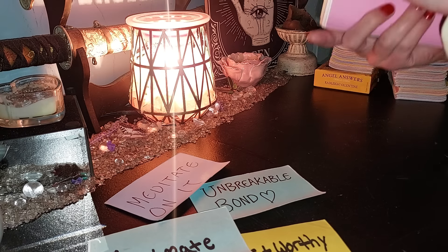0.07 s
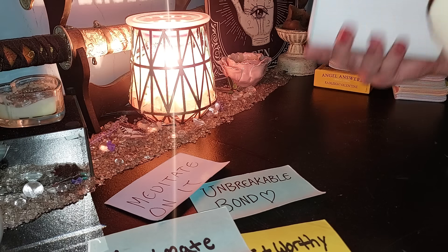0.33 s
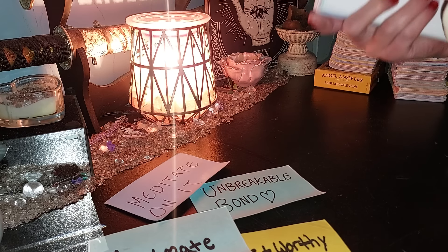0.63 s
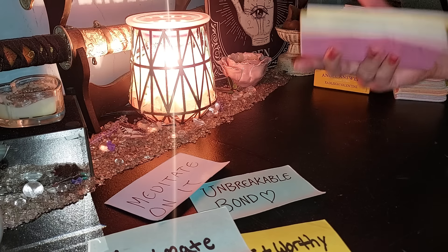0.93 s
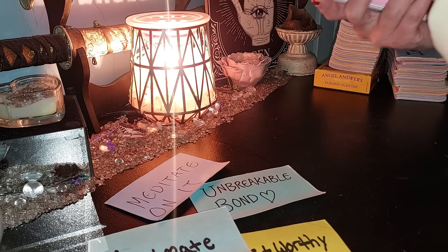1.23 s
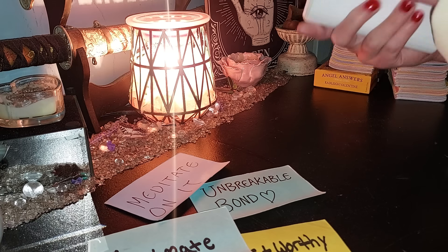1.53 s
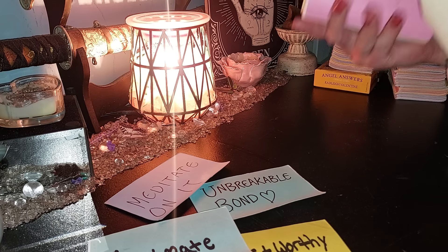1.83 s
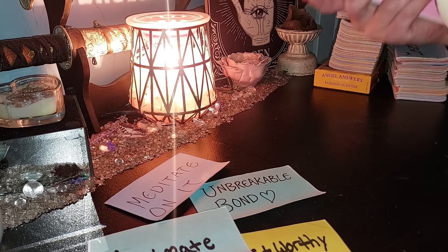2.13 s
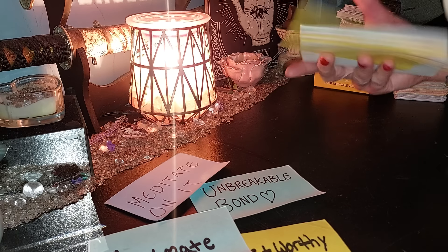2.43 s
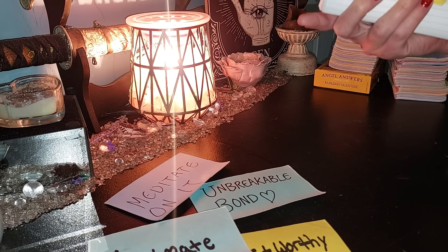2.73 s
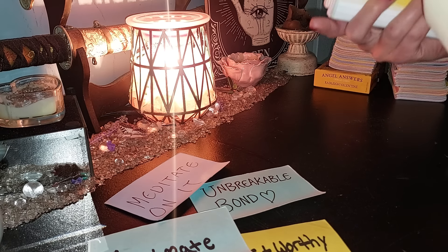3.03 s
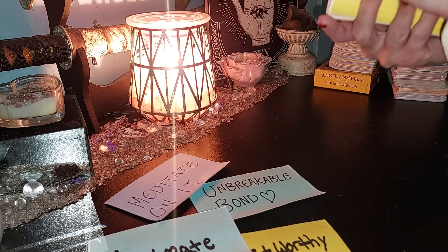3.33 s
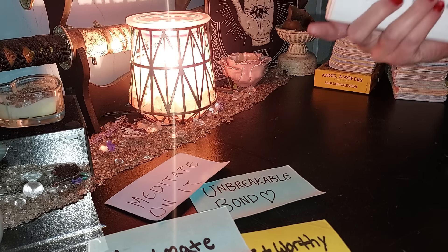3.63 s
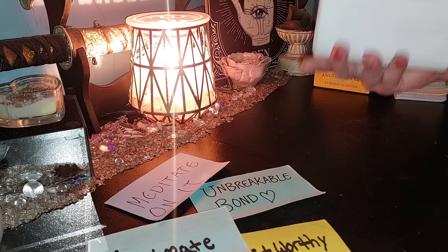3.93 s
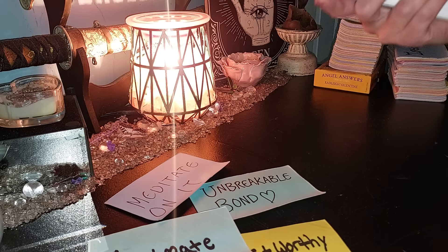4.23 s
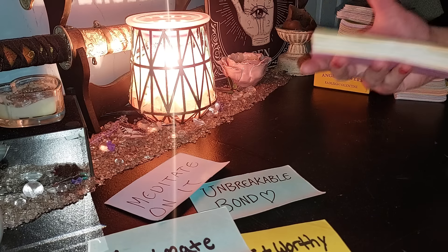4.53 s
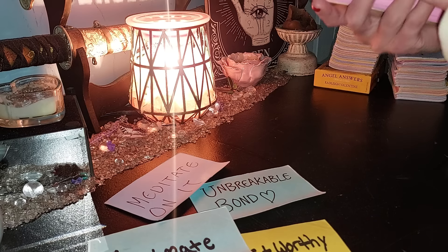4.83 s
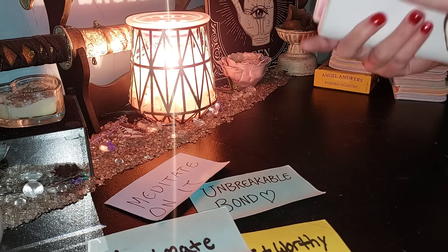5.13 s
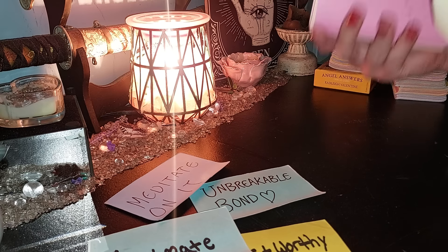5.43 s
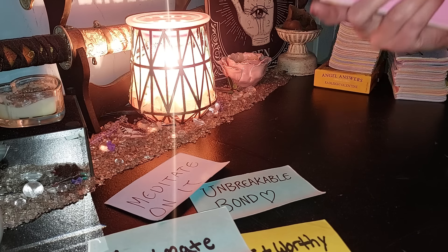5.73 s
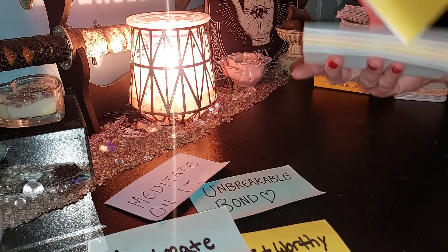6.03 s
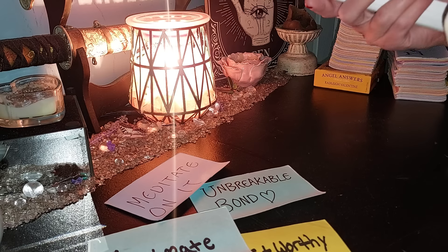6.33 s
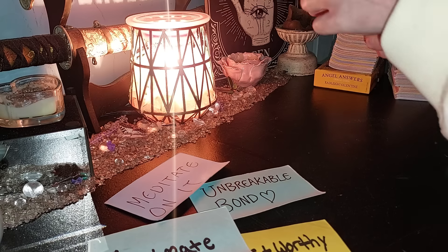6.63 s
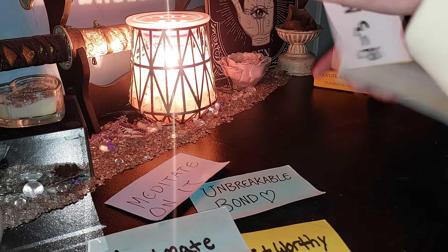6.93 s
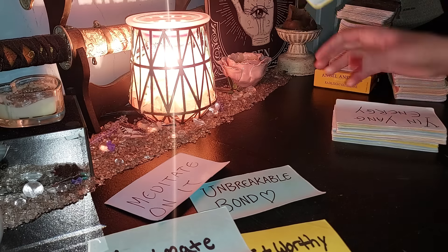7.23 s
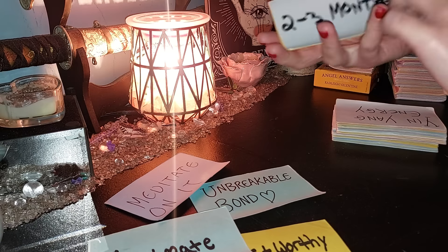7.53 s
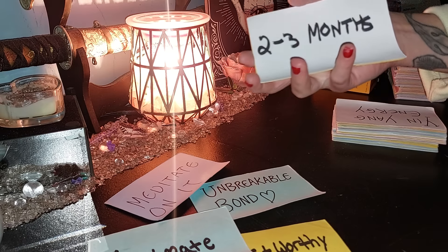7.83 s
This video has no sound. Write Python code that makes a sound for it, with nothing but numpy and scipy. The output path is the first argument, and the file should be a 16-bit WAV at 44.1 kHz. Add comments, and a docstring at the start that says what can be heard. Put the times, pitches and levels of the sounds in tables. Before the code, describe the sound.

A thick deck of cards is shuffled overhand, close to the microphone. Right at the start a packet slaps flat onto the rest and is squared up. Then, about twice a second, another packet is pulled with a papery swish, flicks free of the fingers, scrapes briefly and lands with a crisp slap. Stray cards catch and knock lightly in between. Around 3 seconds the slaps pause, leaving a few hissing slides. They resume at about 3.6 seconds, somewhat louder, and stop just after 6 seconds. Near 7 seconds a card slides out with a soft rub and small knocks, and at 7.2 seconds the deck is set on the desk with a dull thud. Faint sliding follows, then a few softer bumps at 8 seconds. The small room adds a short echo and a quiet, steady low rumble throughout.

```python
"""A thick deck of cards is shuffled overhand above a desk, over the quiet rumble of a small, live room.
A first packet lands edge first, slaps flat and is squared up. Then, about twice a second, another is
pulled, swishes, flicks free of the fingers and scrapes along the deck to its own landing; stray cards
catch and knock. The strokes pause near 3 s, resume, and stop just after 6 s. A card is drawn out, the
deck is set down on the desk with a dull thud at 7.2 s, and a few softer bumps follow at 8 s."""
import sys
import numpy as np
from scipy import signal
from scipy.fft import rfft, irfft, next_fast_len
from scipy.io import wavfile
from scipy.ndimage import uniform_filter1d

SR = 44100
rng = np.random.default_rng(int(sys.argv[2]) if len(sys.argv) > 2 else 0)


def unload_wav(signal):
    """Save mono or channel-first audio to the path in sys.argv[1] as 16-bit WAV at rate SR, clipped to [-1, 1]."""
    wavfile.write(
        sys.argv[1],
        SR,
        np.round(np.clip(np.atleast_2d(signal).T, -1, 1) * 32767).astype(np.int16),
    )


N = 355754
HIT_SIZE, PRE_ROLL = 4096, 256  # samples: one hit's FFT, and the lead-in to its impact
HIT_HZ = np.fft.rfftfreq(HIT_SIZE, 1 / SR)


def amp(db):
    """Decibels to gain."""
    return 10 ** (np.asarray(db) / 20)


def unit(x):
    """Scales to rms 1."""
    return x / np.sqrt(np.mean(x ** 2) + 1e-20)


def curve(points, hz):
    """Reads breakpoints on a log-frequency axis."""
    f, value = np.transpose(points)
    return np.interp(np.log(hz + 1), np.log(f + 1), value)


def add(mix, s, sound):
    """Drops a stereo sound into the mix at time s."""
    part = mix[:, max(round(s * SR), 0):][:, :sound.shape[1]]
    part += sound[:, :part.shape[1]]


def stereo(z, correlation):
    """Blends two unrelated signals into left and right, as mid and side."""
    angle = np.arccos(np.clip(correlation, -1, 1)) / 2
    return np.array([np.cos(angle) * z[0] + side * np.sin(angle) * z[1] for side in (1, -1)])


def whiten(z, bins):
    """Flattens a spectrum's broad shape, keeping its fine ripple."""
    return z / np.sqrt(abs(uniform_filter1d(abs(z) ** 2, bins, axis=-1)) + 1e-12)


def minimum_phase(db):
    """Spectrum of the tightest response that has this EQ."""
    log_gain = np.log(amp(np.maximum(db, -100)))
    mirrored = np.r_[log_gain, log_gain[-2:0:-1]]
    return np.exp(np.conj(signal.hilbert(mirrored)))[:len(db)]


def coloured(noise, eq, correlation):
    """Gives noise an EQ and a stereo width, at rms 1."""
    size = next_fast_len(N)
    hz = np.fft.rfftfreq(size, 1 / SR)
    spectrum = stereo(rfft(noise, size), curve(correlation, hz)) * amp(curve(eq, hz))
    return unit(irfft(spectrum, size)[:, :N])


def spikes(size, per_s):
    """Sparse clicks of random size, different in each channel."""
    return rng.standard_normal((2, size)) * (rng.random((2, size)) < per_s / SR)


def grain(size, depth_db, smooth_samples):
    """The fluttering gain of uneven friction."""
    return amp(depth_db * unit(uniform_filter1d(rng.standard_normal(size), smooth_samples)))


# room tone EQ: f/Hz, level/dB
RUMBLE_EQ = [(15, -30), (30, -9), (45, 4), (130, 0.5), (210, -12), (300, -5), (450, -13), (1000, -22),
             (1650, -23), (5900, -34), (8800, -29.5), (14800, -30), (16000, -31)]
# stereo image of the room: f/Hz, correlation/0-1
ROOM_IMAGE = [(60, 0.5), (300, 0.72), (700, 0.42), (1400, 0), (16000, 0.36)]


def room_tone(level_db=-71.5, lean_left_db=0.5):
    """A steady bed of low rumble."""
    gain = amp(level_db + lean_left_db * np.array([[1], [-1]]))
    return gain * coloured(rng.standard_normal((2, N)), RUMBLE_EQ, ROOM_IMAGE)


# stereo image of close sounds: f/Hz, correlation/0-1
CLOSE_IMAGE = [(60, 0.95), (350, 0.95), (1000, 0.6), (2500, 0), (6000, 0), (16000, .05)]


def contact(eq_db, clatter_s, push, claps_per_s, graze_s=0.0012, graze=0.16):
    """One hit: edges graze, the packet lands with a push, its cards clap together within a few ms."""
    t = (np.arange(HIT_SIZE) - PRE_ROLL) / SR
    envelope = np.where(t < 0, graze * np.exp(-abs(t) / graze_s), np.exp(-(t / clatter_s) ** 2))
    claps = spikes(HIT_SIZE, claps_per_s) * envelope
    claps /= np.linalg.norm(claps, axis=1, keepdims=True) + 1e-9
    # the soft push carries the lows and mids, the claps carry the top
    body = push * np.exp(-2j * np.pi * HIT_HZ * PRE_ROLL / SR) / (1 + (HIT_HZ / 2200) ** 2)
    clatter = stereo(whiten(rfft(claps), bins=41), curve(CLOSE_IMAGE, HIT_HZ))
    return irfft(whiten(clatter + body, bins=65) * minimum_phase(eq_db))[:, :HIT_SIZE // 2]


def card_hits(rows, eq, clatter_s, push, ring_db, ring_width, trim_db):
    """A thick packet thumps (low shelf), a thin edge snaps (high shelf), bent cards ring (one peak)."""
    out = np.zeros((2, N))
    low_shelf = np.interp(np.log(HIT_HZ + 1), np.log([400, 900]), [1, 0])
    high_shelf = np.interp(np.log(HIT_HZ + 1), np.log([2500, 7000]), [0, 1])
    for s, db, thump_db, snap_db, ring_hz in rows:
        ring = ring_db / (1 + ((HIT_HZ - ring_hz) / (ring_width * ring_hz)) ** 2)
        eq_db = curve(eq, HIT_HZ) + db + thump_db * low_shelf + snap_db * high_shelf + ring
        add(out, s - PRE_ROLL / SR, contact(eq_db, clatter_s, push, claps_per_s=12000))
    return amp(trim_db) * out


# landing EQ: f/Hz, level/dB
SLAP_EQ = [(25, -27), (60, -6), (130, -5.5), (350, 1.5), (800, -5.5), (1200, -9.5), (1900, -8),
           (2600, -13.5), (3400, -15.5), (4800, -16.5), (6500, -22), (8700, -23.5), (10000, -20.5),
           (16000, -22)]
# voicing of the edge touch: snap/dB, ring f/Hz
EDGE_VOICE = (1.1, 1700)
# voicing of the settle: thump/dB, snap/dB, ring f/Hz
SETTLE_VOICE = (7.9, 4.9, 750)
# packet landings: edge t/s, edge level/dB, edge thump/dB,
# slap t/s, slap level/dB, thump/dB, snap/dB, ring f/Hz, settle level/dB
LANDING_CUES = [(0.013, -1, 0, .031, 7.5, -6, -2.5, 1750, -15.5),
                (0.5437, -2, 5, .555, 4.5, -3, 0, 1480, -2.5),
                (1.0353, 2.5, 3.5, 1.0492, 7, -18, 2, 2000, -4),
                (1.540, -22, -4, 1.542, 5, 2.5, -10, 1530, -1.5),
                (2.041, -6.5, 6.5, 2.0545, 5.5, -9, -6.5, 2630, -4),
                (2.533, -16, -1, 2.5368, -2.5, 2.5, -9, 1500, -2.5),
                (3.6197, 3.5, -7, 3.638, 14, -4, -4, 2740, -10),
                (4.1416, 2, 2.5, 4.1583, 12, -5.5, -4, 2670, -7),
                (4.657, 0.5, -8, 4.6597, 0.5, -14, 3, 603, -4),
                (5.1665, -27, -6, 5.1685, 6.5, 1.5, -3, 1440, 0),
                (5.669, -14, -6, 5.6735, 6.5, -8.5, -4.5, 1200, 0),
                (6.147, 2.5, 8.5, 6.175, 10.5, 0.5, -7, 1190, -12)]


def landings(settle_delay_s=0.008):
    """Three hits a packet: the edge touches, the face slaps, the packet settles into the palm."""
    edges, faces, settles = [], [], []
    for edge_s, edge_db, edge_thump_db, slap_s, slap_db, *slap_voice, settle_db in LANDING_CUES:
        edges.append((edge_s, edge_db, edge_thump_db, *EDGE_VOICE))
        faces.append((slap_s, slap_db, *slap_voice))
        settles.append((slap_s + settle_delay_s, settle_db, *SETTLE_VOICE))
    out = card_hits(edges, SLAP_EQ, clatter_s=.0055, push=.86, ring_db=4, ring_width=.22, trim_db=-1.5)
    out += card_hits(faces, SLAP_EQ, clatter_s=.0027, push=1.18, ring_db=7.5, ring_width=.12,
                     trim_db=-1.5)
    out += card_hits(settles, SLAP_EQ, clatter_s=.0057, push=1.1, ring_db=4, ring_width=.36,
                     trim_db=-3.5)
    return out


# bright hiss of a firm rub: f/Hz, level/dB
HISS_EQ = [(300, -32.5), (2000, -10), (4000, 0.5), (6000, 1.5), (8500, -0.5), (10000, 2), (12500, 3),
           (16000, 1.5)]
# airy swish of a card barely touching the deck: f/Hz, level/dB
SWISH_EQ = [(300, -28), (3000, -18.5), (6000, -11), (9200, -5.5), (10400, -2), (13000, 0.5), (16000, -5.5)]
# rasp under the hiss: f/Hz, level/dB
RASP_EQ = [(60, 0.5), (250, -1), (700, -6.5), (1300, -7), (1850, 5), (2400, -8), (4000, -4), (7000, -6),
           (16000, -16)]


def friction(rows, rasp_trim_db=-3.5):
    """Card faces rub: tiny slips of uneven size under a swell that follows the hand's speed."""
    t = np.arange(N) / SR
    hiss, swish, rasp = np.zeros((3, N))
    for start, end, db, rasp_db in rows:
        on = (t > start) & (t < end)
        speed = abs(np.sin(np.pi * (t[on] - start) / (end - start))) ** 0.91
        lightness = np.clip(-rasp_db / 18, 0, 1)  # a light touch has little rasp and thins to a swish
        hiss[on] += amp(db) * speed * np.sqrt(1 - lightness)
        swish[on] += amp(db) * speed * np.sqrt(lightness)
        rasp[on] += amp(db + rasp_db + rasp_trim_db) * speed
    grip = grain(N, depth_db=3.5, smooth_samples=90)
    return sum(envelope * coloured(grip * rng.standard_normal((2, N)), eq, CLOSE_IMAGE)
               for envelope, eq in [(hiss, HISS_EQ), (swish, SWISH_EQ), (rasp, RASP_EQ)])


# glide in, slide home, square up, timed from each edge touch:
# start t/s, end t/s, level/dB, rasp/dB re level
LANDING_RUB_CUES = [(-.03, .015, -62.5, -5.5), (0.011, 0.108, -59.5, -6.5), (0.153, 0.196, -64, 0.5)]
# further slides, during, between and after the strokes: start t/s, end t/s, level/dB, rasp/dB re level
SLIDE_CUES = [(0.207, 0.375, -75.5, 4.5), (2.412, 2.48, -65.5, -5.5), (3.044, 3.086, -51, -12.5),
              (3.067, 3.164, -56.5, -8.5), (3.229, 3.262, -57.5, -6), (4.536, 4.607, -66.5, -4),
              (6.38, 6.405, -65.5, -2), (6.791, 6.977, -64.5, -24.5), (6.938, 7.038, -61, -10),
              (7.066, 7.226, -65, -11.5), (7.53, 7.647, -68, -6.5), (7.675, 8.011, -81.5, -12.5)]
# packets lifted off the deck: flick t/s, flick level/dB, pull level/dB, swish level/dB,
# swish length/s, finger level/dB, scrape level/dB, scrape f/Hz
LIFT_CUES = [(0.4733, -12, -71, -63, .04, -15.5, -70, 920), (0.986, -12, -63, -67, 0.056, -21.5, -77, 890),
             (1.4923, -8, -61, -63, 0.038, -15.5, -60, 800),
             (1.9918, -10.5, -59.5, -70, 0.053, -18.5, -68, 620),
             (2.475, -17, -62, -60, 0.02, -36, -58, 826), (3.555, -11.5, -64, -70, 0.031, -30, -77, 430),
             (4.0714, -11, -64, -62, 0.024, -23, -69, 950), (4.591, -8, -63.5, -70, 0.035, -26.5, -65, 595),
             (5.102, -4.5, -58.5, -57, 0.022, -18.5, -64, 1010),
             (5.612, -7, -60, -62.5, 0.03, -12.5, -85, 700),
             (6.103, -11.5, -62.5, -65.5, 0.086, -39, -68, 900)]


def rubs(pull_lead_s=0.1917, pull_length_s=0.074, swish_lead_s=0.091,
         pull_rasp_db=-2.5, swish_rasp_db=-19):
    """Cards rub round each landing, in further slides, and in a pull and a swish before each flick."""
    rows = list(SLIDE_CUES)
    for edge_s, *_ in LANDING_CUES:
        rows += [(edge_s + start, edge_s + end, *levels) for start, end, *levels in LANDING_RUB_CUES]
    for flick_s, _, pull_db, swish_db, swish_length_s, *_ in LIFT_CUES:
        pull_s, swish_s = flick_s - pull_lead_s, flick_s - swish_lead_s
        rows += [(pull_s - pull_length_s / 2, pull_s + pull_length_s / 2, pull_db, pull_rasp_db),
                 (swish_s - swish_length_s / 2, swish_s + swish_length_s / 2, swish_db, swish_rasp_db)]
    return friction(rows)


# EQ of finger taps and stray cards: f/Hz, level/dB
TAP_EQ = [(25, -24.5), (100, -0.5), (300, 0.5), (1000, -5), (1900, -6), (4000, -8.5), (8000, -18.5),
          (16000, -28)]
# voicing of the finger tap: thump/dB, snap/dB, ring f/Hz
FINGER_VOICE = (2.2, -4.5, 1700)


def finger_taps(lead_s=0.079):
    """A finger taps the packet softly just ahead of each flick."""
    rows = [(flick_s - lead_s, db, *FINGER_VOICE) for flick_s, *_, db, _, _ in LIFT_CUES]
    return card_hits(rows, TAP_EQ, clatter_s=.006, push=.2, ring_db=7, ring_width=.12, trim_db=-3.5)


# flick EQ: f/Hz, level/dB
FLICK_EQ = [(25, -25.5), (80, 1.5), (200, 2.5), (500, -7), (1500, -12), (5000, -13.5), (8700, -17.5),
            (10000, -12), (16000, -13.5)]
# voicing of the flick: thump/dB, snap/dB, ring f/Hz
FLICK_VOICE = (1.5, 0.82, 460)


def flicks():
    """Each packet snaps free as it leaves the fingers."""
    rows = [(s, db, *FLICK_VOICE) for s, db, *_ in LIFT_CUES]
    return card_hits(rows, FLICK_EQ, clatter_s=.0034, push=.63, ring_db=.5, ring_width=.13, trim_db=0)


def scrapes(delay_s=0.008, band_ratio=1.2):
    """A freed packet scrapes along the deck until it lands, exciting the hollow between it and the palm."""
    out = np.zeros((2, N))
    for flick_s, *_, db, hz in LIFT_CUES:
        start = flick_s + delay_s
        end = min(edge_s for edge_s, *_ in LANDING_CUES if edge_s > flick_s)
        size = round((end - start) * SR)
        slips = rng.standard_normal((2, size)) * grain(size, depth_db=2, smooth_samples=120)
        band = signal.butter(2, [hz / band_ratio, hz * band_ratio], "bandpass", fs=SR, output="sos")
        hollow = unit(signal.sosfilt(band, stereo(slips, curve(CLOSE_IMAGE, hz))))
        add(out, start, amp(db) * hollow * signal.windows.tukey(size, .3))
    return out


# stray card knocks, and low bumps about 70 ms after the landings near 4.14, 4.66 and 5.17 s: # t/s, level/dB,
# thump/dB, snap/dB, ring f/Hz
STRAY_CUES = [(1.336, -25.5, -14, -22, 1790), (1.821, -22.5, -28, 7.5, 2430), (2.419, -26, 2, -4, 2620),
              (2.468, -24, -5, -12, 2720), (2.484, -17, 8.5, -29, 820), (2.875, -24.5, 1.5, 5, 1780),
              (3.052, -27.5, 19.5, 17, 3290), (4.21, -3.5, 5.5, -1, 657), (4.733, -22.5, 19, -20, 576),
              (5.239, -24, 25, -24, 550), (5.017, -13.5, -4.5, -21, 675), (5.446, -20, -15, 0, 1800),
              (6.141, -15, 1, 7.5, 1080), (6.1733, -5.5, 3, 16, 12240), (6.238, -14.5, -15, -19, 2260),
              (7.009, -11, 1.5, -16, 850), (7.014, -9, 4, -31.5, 1770), (7.107, -12, 4, -27, 1884),
              (7.118, -26, 16.5, 8, 643), (7.616, -23, -3, -8, 2450)]


def stray_cards():
    """Stray cards catch and knock, and low bumps follow a few landings, each with a narrow ring."""
    return card_hits(STRAY_CUES, TAP_EQ, clatter_s=.0032, push=.73, ring_db=11.5, ring_width=.085,
                     trim_db=-1.5)


# dull desk EQ: f/Hz, level/dB
THUD_EQ = [(25, -25), (60, 6.5), (120, 3), (220, 0), (350, 2), (650, -15), (1000, -28), (2000, -65),
           (6000, -67.5)]
# bumps on the desk: t/s, level/dB
THUD_CUES = [(6.94, -20.5), (7.2154, -1.5), (7.2241, 3), (8.023, -17), (8.049, -8.5), (8.062, -7)]


def desk_thuds():
    """Deck and hands meet the desk top with soft, heavy pushes."""
    out = np.zeros((2, N))
    for s, db in THUD_CUES:
        thud = contact(curve(THUD_EQ, HIT_HZ) + db, clatter_s=.0048, push=2.6, claps_per_s=4300)
        add(out, s - PRE_ROLL / SR, thud)
    return out


# reverb decay: f/Hz, t60/s
TAIL_T60 = [(60, 0.34), (300, 0.28), (1000, 0.31), (3000, .36), (8000, 0.25), (16000, .25)]
# reverb EQ: f/Hz, level/dB
TAIL_EQ = [(50, 1.5), (150, -2), (400, -3), (1000, -1.5), (2500, 0), (6000, 0), (16000, -3.5)]
# slapback off the far wall: f/Hz, level/dB
ECHO_EQ = [(60, -8), (200, 2.5), (450, -3), (900, -26), (3000, -3.5), (16000, -9)]
# standing waves of desk and room: f/Hz, level/dB, t60/s
ROOM_MODES = [(137.8, 2, 0.28), (193.6, -9.5, 0.2), (265, -6, 0.33), (322, -3, .35), (406, -5, 0.29),
              (587, -1, 0.27), (717, -9, 0.29), (853, -5.5, 0.35), (1140, -9, 0.12), (1240, -13.5, 0.53),
              (1710, -19.5, .3), (2560, -16.5, .3)]


def room_response(tail_db=1, plateau_s=0.04, early_db=-5, early_s=0.011, echo_db=-11.5, echo_s=0.071,
                  modes_db=-51):
    """Desk clutter answers at once, a tail stays level briefly and fades, a wall echoes, modes ring."""
    size = 2 ** 15
    t, hz = np.arange(size) / SR, np.fft.rfftfreq(size, 1 / SR)
    bands, age, reflections = signal.stft(spikes(size, per_s=5000) * (t > .005), SR, nperseg=256)
    fade = amp(-60 * (np.hypot(age, plateau_s) - plateau_s) / curve(TAIL_T60, bands)[:, None])
    tail = signal.istft(reflections * fade, SR, nperseg=256)[1][:, :size]
    early = spikes(size, per_s=2500) * (t > .003) * np.exp(-t / early_s)
    echo = spikes(size, per_s=2100) * (t > echo_s) * np.exp(-abs(t - echo_s) / .0065)
    spectrum = (amp(tail_db + curve(TAIL_EQ, hz)) * whiten(rfft(tail), bins=41)
                + amp(early_db) * whiten(rfft(early), bins=301)
                + amp(echo_db + curve(ECHO_EQ, hz)) * whiten(rfft(echo), bins=301))
    response = irfft(stereo(spectrum, curve(ROOM_IMAGE, hz))) * (t < .6)
    attack = 1 - np.exp(-t / .006)
    for mode_hz, db, t60 in ROOM_MODES:
        response += amp(modes_db + db - 60 * t / t60) * np.sin(2 * np.pi * mode_hz * t) * attack
    return response


def reverb(send, patterns=5, fades_per_s=100):
    """The send cycles quickly through several reflection patterns, keeping the tail smooth."""
    position = (fades_per_s * np.arange(N) / SR - np.arange(patterns)[:, None]) % patterns
    fades = np.sin(np.pi / 2 * np.minimum(position, 2))
    return sum(signal.fftconvolve(send * fade, room_response(), axes=1)[:, :N] for fade in fades)


def scene():
    """The mix: close cards, their reverb, and room tone underneath."""
    # stem, reverb send/dB
    stems = [(landings(), 0), (rubs(), -2), (finger_taps(), -3.5), (flicks(), -4),
             (scrapes(), -9.5), (stray_cards(), -3.5), (desk_thuds(), 0)]
    close = sum(stem for stem, _ in stems)
    send = sum(amp(db) * stem for stem, db in stems)
    return close + reverb(send) + room_tone()


# balance of the two microphone ports: f/Hz, left minus right level/dB
PORT_BALANCE = [(100, 2), (300, -.8), (1000, .3), (2200, 2), (4500, 1.2), (8000, 2), (12500, -3),
                (16000, -2)]


def record(dry, low_cut_hz=17, high_cut_hz=16100):
    """Master chain: the colour of the two ports, a rumble filter, a steep high cut."""
    size = next_fast_len(N + HIT_SIZE)
    tilt_db = curve(PORT_BALANCE, np.fft.rfftfreq(size, 1 / SR)) * np.array([[.5], [-.5]])
    tilted = irfft(rfft(dry, size) * amp(tilt_db), size)[:, :N]
    low_cut = signal.butter(2, low_cut_hz, "highpass", fs=SR, output="sos")
    high_cut = signal.firwin(511, high_cut_hz, window=("kaiser", 9), fs=SR)
    return signal.oaconvolve(signal.sosfilt(low_cut, tilted), high_cut[None], "same")


dry = scene()
out = record(dry)
unload_wav(out)
```